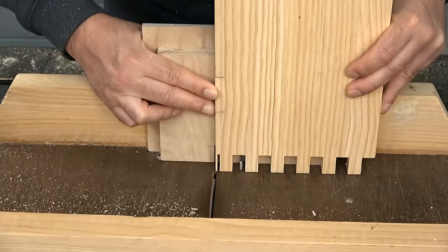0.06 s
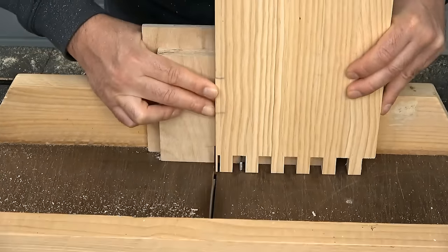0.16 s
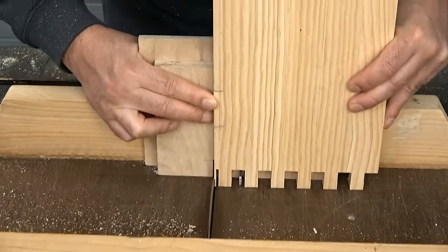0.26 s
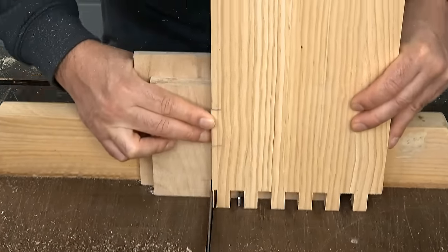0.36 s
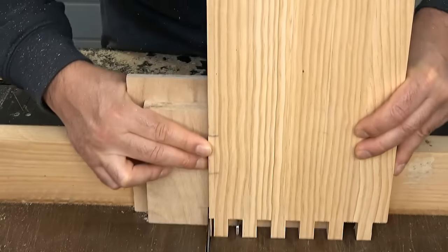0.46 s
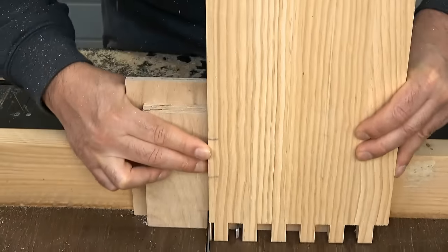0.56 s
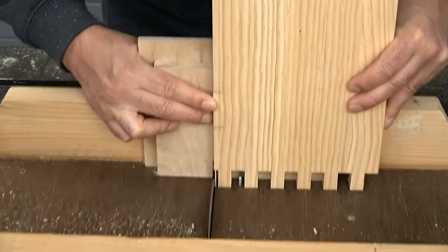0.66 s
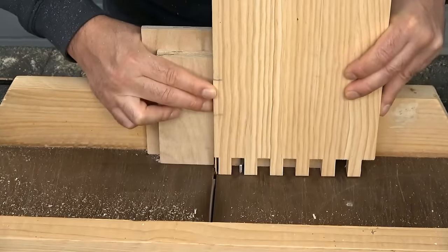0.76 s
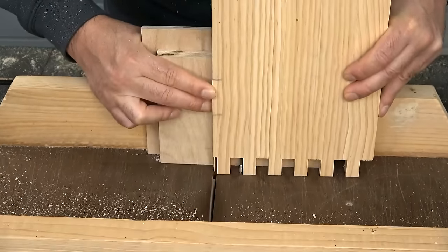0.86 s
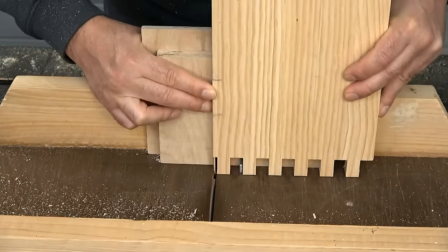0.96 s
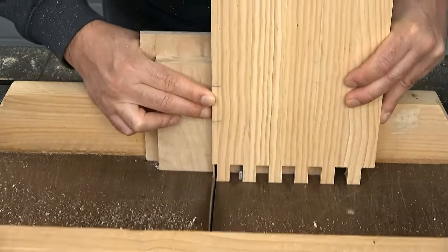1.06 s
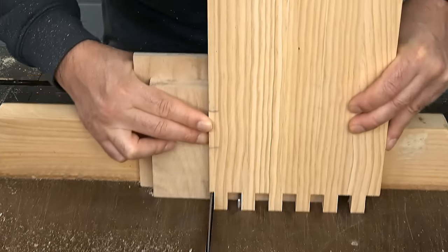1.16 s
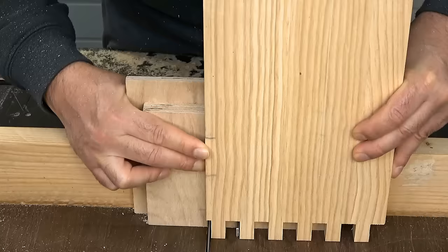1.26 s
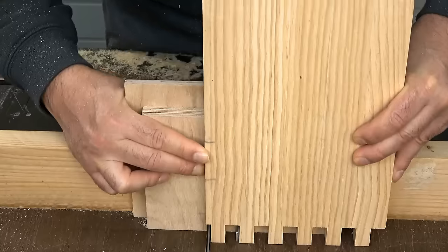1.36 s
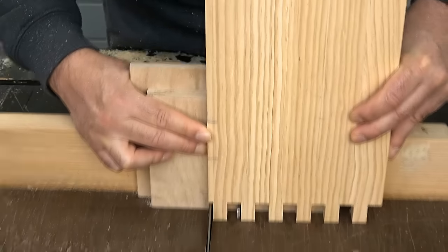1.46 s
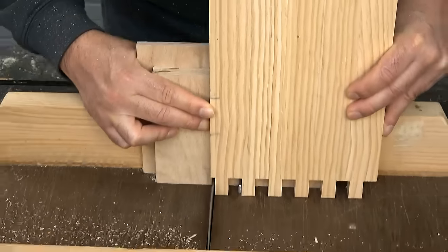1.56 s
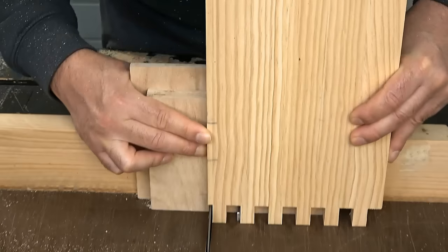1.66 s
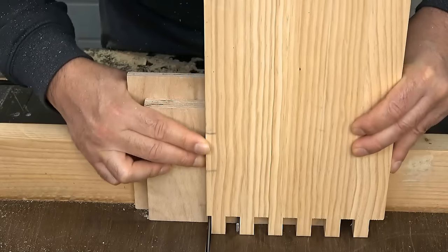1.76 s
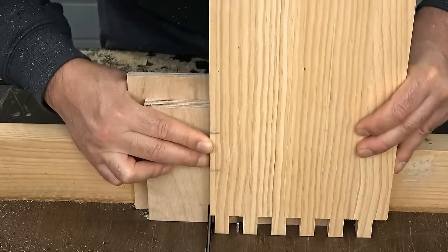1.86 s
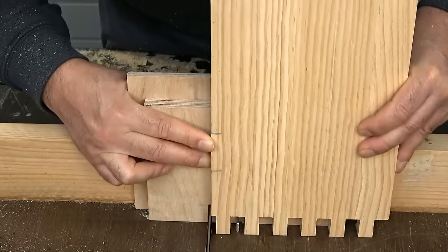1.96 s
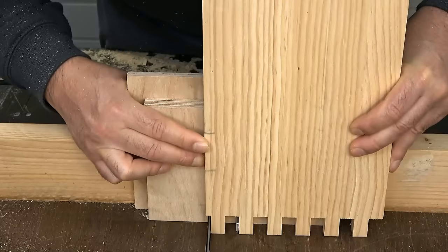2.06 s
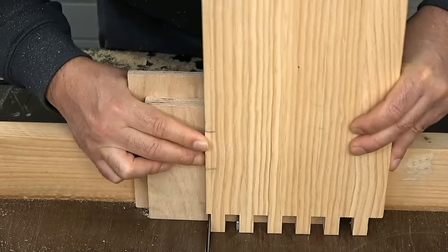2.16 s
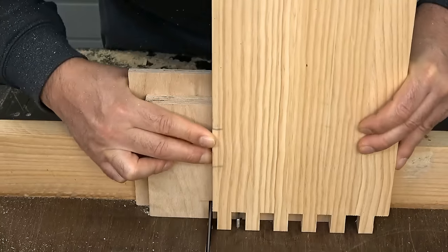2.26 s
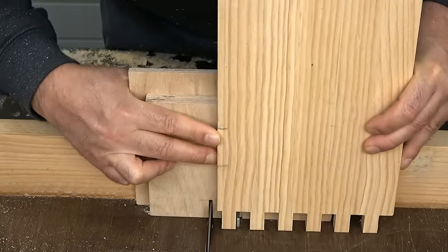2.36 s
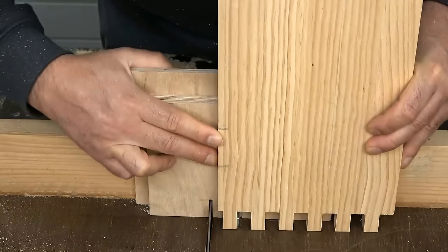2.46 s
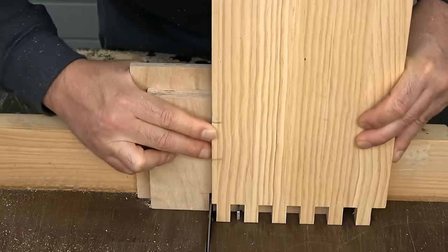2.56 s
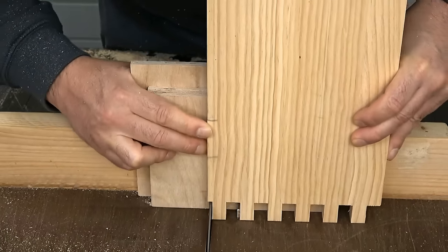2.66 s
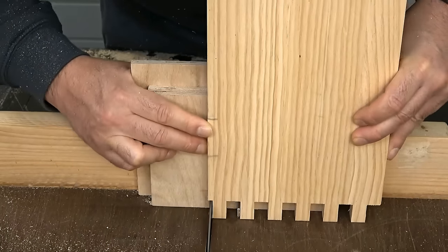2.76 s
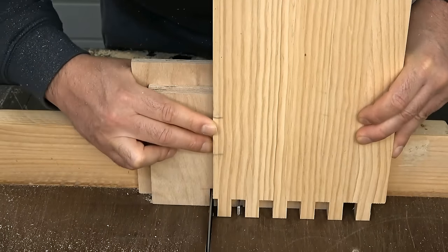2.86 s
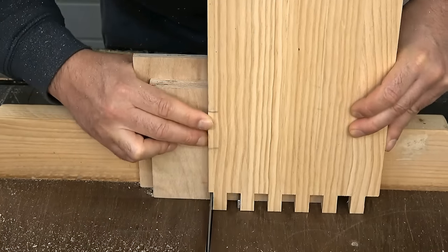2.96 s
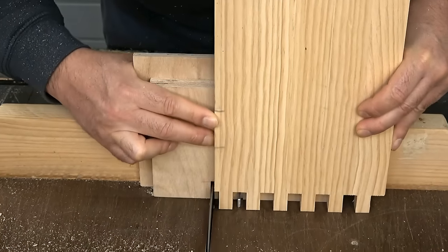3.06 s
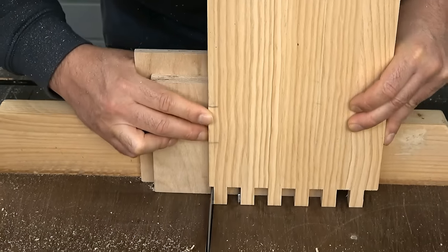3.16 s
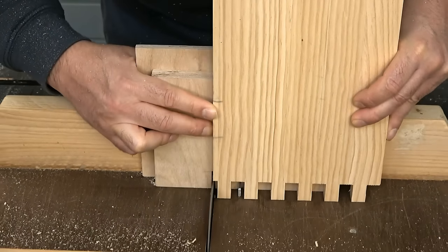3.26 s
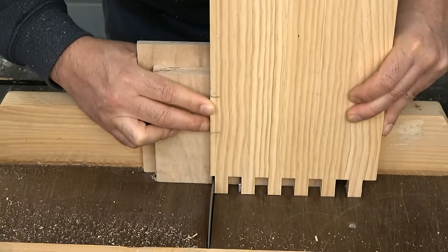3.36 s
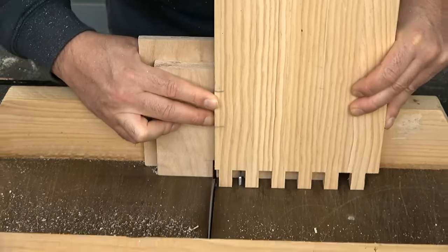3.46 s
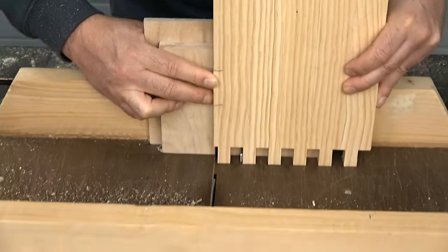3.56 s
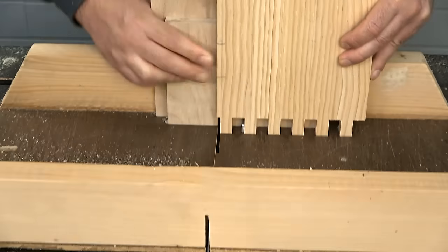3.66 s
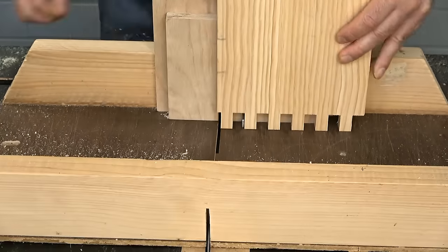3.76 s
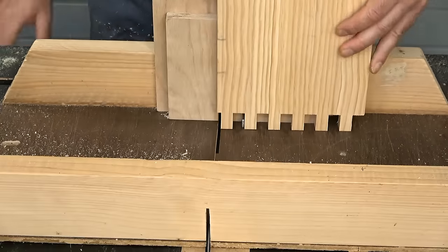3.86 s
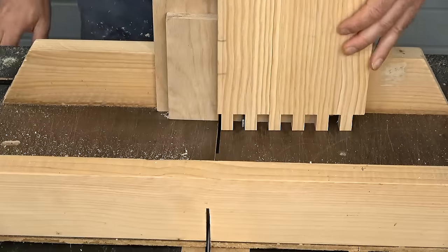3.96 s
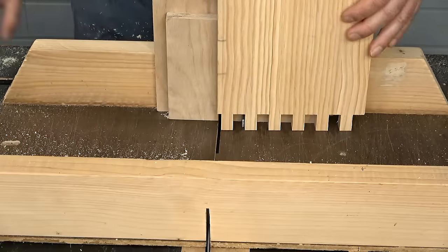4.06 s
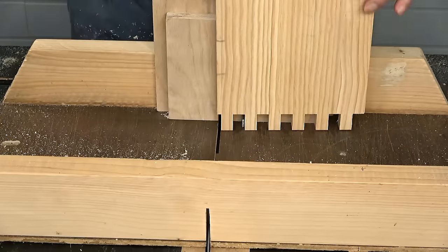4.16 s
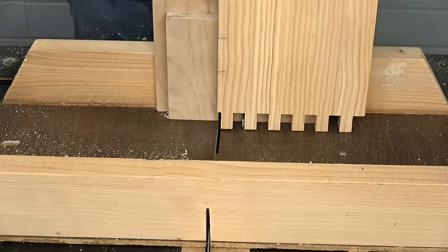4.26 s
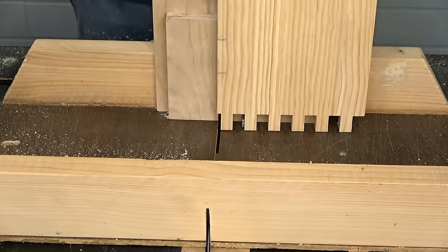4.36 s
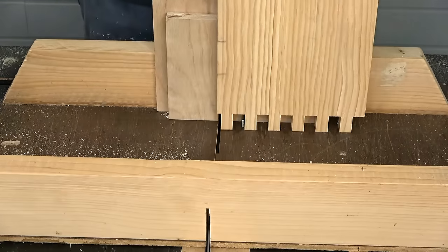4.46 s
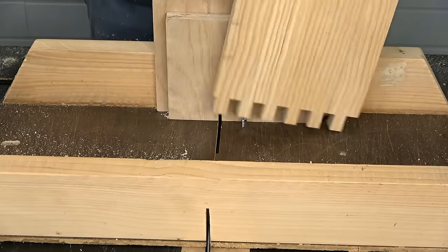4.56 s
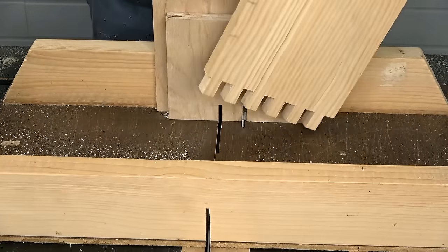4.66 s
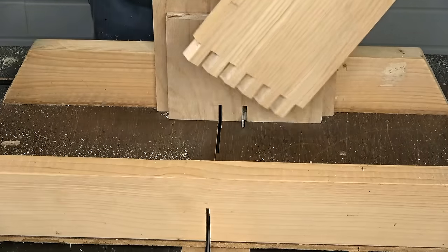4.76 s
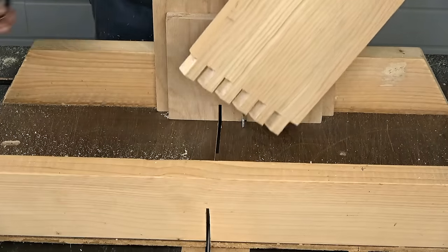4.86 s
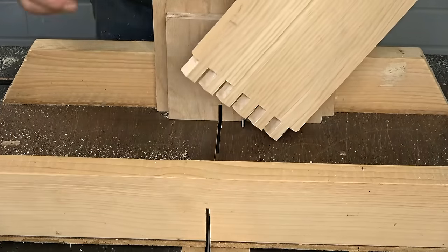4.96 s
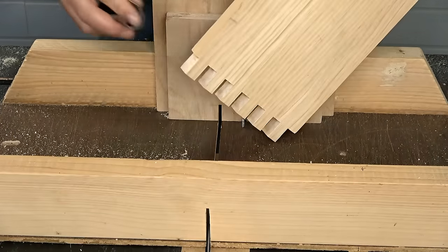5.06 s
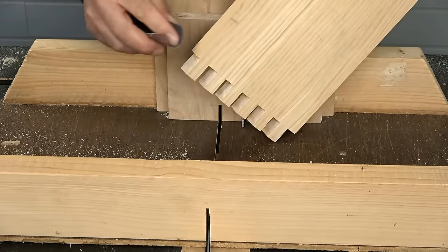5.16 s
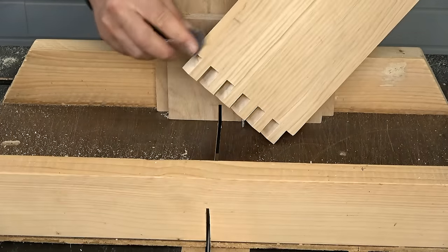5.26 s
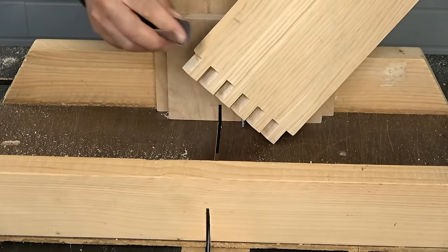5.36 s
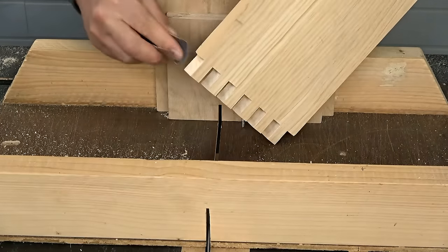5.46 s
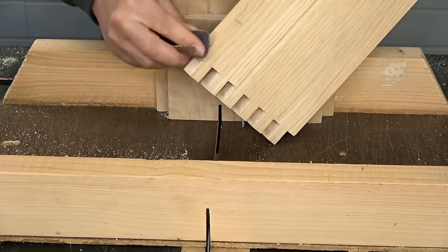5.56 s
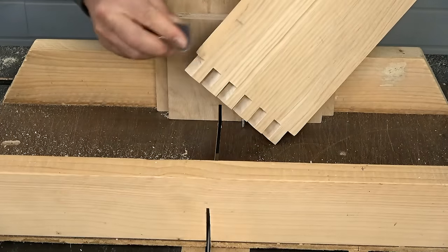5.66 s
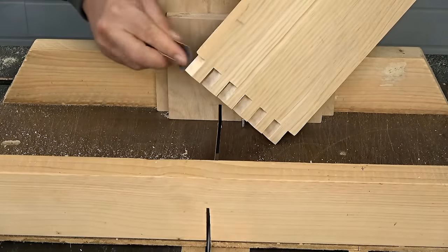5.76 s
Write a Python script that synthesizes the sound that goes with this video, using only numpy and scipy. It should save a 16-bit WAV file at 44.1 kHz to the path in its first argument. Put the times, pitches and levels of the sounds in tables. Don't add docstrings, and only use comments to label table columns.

```python
import sys
import numpy as np
from scipy import signal
from scipy.fft import rfft, irfft, next_fast_len
from scipy.io import wavfile
from scipy.ndimage import uniform_filter1d

SR = 44100
rng = np.random.default_rng(int(sys.argv[2]) if len(sys.argv) > 2 else 0)


def gain_from_decibels(decibels):
    exponent = np.asarray(decibels, float) / 20
    return 10 ** exponent


def waveform_to_disk(signal):
    frames = np.transpose(np.atleast_2d(signal))
    scaled = np.clip(frames, -1, 1) * 32767
    samples = np.round(scaled).astype(np.int16)
    wavfile.write(sys.argv[1], SR, samples)


N = 255766
TIME = np.arange(N) / SR
WHINE_PER_TOOTH, WHINE_PER_TURN, WHINE_PER_GEAR = 6.96, 150, 2.1

# time_s, whine_hz, whine_db, left_lead_rad
RUNNING = [(0, 7032, -33, 0), (.12, 7068, -32, -.9), (.31, 7088, -35.5, -.5), (.41, 6888, -38, .2),
           (.55, 6965, -38.5, .2), (.68, 7018, -32, .3), (.9, 7066, -31.5, -.5), (1.0, 7070, -36.5, -2.2),
           (1.12, 7082, -33, -1.4), (1.2, 7054, -33.5, -.7), (1.48, 7080, -32.5, -1.2),
           (1.62, 7065, -35, -1.3), (2.25, 7034, -32.5, .3), (2.6, 7056, -31.3, -1),
           (3.15, 7056, -33.5, -3), (3.5, 7052, -35, -1.7), (3.75, 7053, -31.3, -1.2),
           (4.06, 7030, -34, .2)]
# centre_s, length_s, level_db
SHADES = [
    (.11, .1, -11),
    (.57, .09, -8),
    (1.07, .44, -10),
    (1.54, .1, -5),
    (1.78, .05, -7),
    (2.15, .17, -12),
    (2.62, .14, -12),
    (3.12, .24, -12),
    (3.4, .3, -3),
]
# start_s, length_s, level_db
OCTAVE = [
    (-.05, .45, -54),
    (.65, .25, -54),
    (1.3, .5, -56),
    (2.2, .25, -57),
    (2.7, .55, -51.5),
    (3.48, .55, -54.5),
]


def brush_whine(whine, on):
    _, right_db, lead = columns(RUNNING)
    shade = sum(db * np.exp(-(2 * (TIME - s) / length) ** 4) for s, length, db in SHADES)
    left_db = right_db - 4.5 + shade + 2.5 * walk(13)
    lag = np.exp(.5j * np.array([[1], [-1]]) * lead)
    wobble = 1 + .1 * np.sin(2 * np.pi * whine / WHINE_PER_TURN)
    level = gain_from_decibels(np.array([left_db, right_db]) + .27) * wobble
    sing = level * (lag * tone(whine, rough=.2, grain_hz=70.27)).real
    octave_level = spells(OCTAVE, -60.5, .08) * gain_from_decibels(1.5 + 1.5 * walk(8))
    octave = octave_level * (np.sqrt(lag) * tone(2 * whine, rough=.25, grain_hz=70)).real
    return (sing + octave) * on


# time_s, gear_hz, gear_db, whine_db
BRAKING = [
    (4.065, 3340, -48, -36),
    (4.14, 2820, -38.5, -40),
    (4.22, 2400, -44, -43),
    (4.31, 2095, -36.5, -42.5),
    (4.42, 1830, -37.5, -44),
    (4.6, 1500, -40.5, -50),
    (4.75, 1235, -45, -51),
    (4.98, 950, -43, -53),
    (5.32, 600, -45, -54),
]
# multiple, level_db
OVERTONES = [(4, -52), (5, -48.5), (6, -47)]
# pitch_hz, width_hz, level_db
RINGS = [(1470, 14, 3), (2030, 25, 5), (3830, 24, 7.5)]


def braking_gears(whine, off):
    gear_hz, gear_db, coast_db = columns(BRAKING)
    turns = whine / WHINE_PER_GEAR
    gear = gain_from_decibels(gear_db + 1.3 * walk(18)) * tone(turns, rough=1.8, grain_hz=290).real
    gear = gear + gain_from_decibels(coast_db + 1.3 * walk(18)) * tone(whine, rough=2.2, grain_hz=520).real
    for k, db in OVERTONES:
        vent = np.exp(-((k * gear_hz - 8420) / 1000) ** 2)
        gear = gear + vent * gain_from_decibels(db + 2 * walk(20)) * tone(k * turns, rough=1., grain_hz=400).real
    gear = gear * off
    gear = gear + sum(gain_from_decibels(db) * resonate(gear, hz, width) for hz, width, db in RINGS)
    gear = gear + shaken_panel(gear_hz) * off
    return place(gear, .15 * np.roll(gear, 300), -1.5) + room(gear)


def shaken_panel(gear_hz):
    peak_hz, reach_hz = 1470, 300
    nearness = 1 / (1 + ((gear_hz - peak_hz) / reach_hz) ** 4)
    panel = tone(1465 * TIME, rough=1.1, grain_hz=120).real
    return gain_from_decibels(-41.5 + 2.4 * walk(15)) * nearness * panel


# start_s, length_s, level_db
WHISTLES = [(-.05, .42, -42), (.37, .1, -46), (.56, .08, -44), (.79, .2, -43.5), (.97, .22, -41.5),
            (1.2, .17, -47), (1.37, .2, -42.5), (1.57, .23, -44.5), (2.26, .3, -38.5), (2.55, .07, -41.5),
            (2.91, .19, -40), (3.12, .2, -51), (3.46, .09, -42), (3.6, .42, -48.5), (4.13, .1, -50)]


def slot_whistle(teeth):
    level = spells(WHISTLES, -60, .07) * gain_from_decibels(.7 * walk(14))
    whistle = level * tone(2 * teeth + .12 * walk(25), rough=.15, grain_hz=45).real
    return place(whistle, 0, -.27)


# start_s, length_s, level_db, brightest_stack (-1 low to 1 high), roughness (0 to 1.5)
BITES = [(.3, .045, -36.5, .45, .45), (.352, .066, -37.5, .15, .45), (.445, .02, -43, -.6, .9),
         (.487, .012, -39, .3, 1.3), (.512, .012, -41, .4, 1.3), (.527, .014, -39, .2, 1.3),
         (.543, .065, -37, -.5, 1.2), (.61, .03, -39, -.8, 1.1), (.725, .025, -42, .1, .6),
         (.74, .035, -39, -.7, .7), (1.123, .03, -40.5, .5, .5), (1.168, .038, -44, .4, .6),
         (2.19, .03, -46, 0, .5)]
# multiple, level_db
TEETH = [
    [(6, -2), (5, -11)],
    [(7, -6), (8, 0), (9, -7)],
    [(3, -3), (4, -8), (5, -8), (10, -1), (11, -13), (12, -10), (13, -13), (14, -13)],
]


def teeth_in_wood(teeth):
    shapes = [gate(s - .002, s + length + .004, edge=.004) for s, length, *_ in BITES]
    stacks = np.arange(-1, 2)[:, None]
    depth, rough = 0, np.zeros(N)
    for (_, _, db, bright, roughness), shape in zip(BITES, shapes):
        depth = depth + gain_from_decibels(db - 9 * (stacks - bright) ** 2) * shape
        rough = np.maximum(rough, np.clip(roughness, 0, 1.5) * (shape > 0))
    cut = 0
    for level, stack in zip(depth, TEETH):
        for k, db in stack:
            blow = tone(k * teeth, rough=rough, grain_hz=330).real
            cut = cut + level * gain_from_decibels(db + 2.5 * walk(25)) * blow
    wide_chips = unit(resonate(rng.standard_normal(N), 7600, 5000))
    narrow_chips = unit(resonate(rng.standard_normal(N), 6200, 450))
    chips = rough * (gain_from_decibels(-7) * depth[1] * wide_chips + gain_from_decibels(-1.5) * depth[0] * narrow_chips)
    cut = gain_from_decibels(-2) * cut + chips
    return place(cut, .35 * np.roll(cut, 40), -.27)


# pitch_hz, level_db (per Hz)
AIR_COLOUR = [(18, -50.5), (30, -31), (160, -10.5), (291, -9.5), (478, -6.5), (1020, -9.5), (1500, -8),
              (2060, -7.5), (2400, -11), (3300, -9.5), (5420, -11), (6850, -9), (8020, -13), (13900, -18.5),
              (15400, -26)]
# pitch_hz, side_minus_mid_db
AIR_SIDE = [(60, -11), (110, -18.5), (200, -21), (380, -18), (700, -17), (1290, -17), (2380, -16),
            (4400, -18), (8120, -5), (15000, -6.5)]
# pitch_hz, left_minus_right_db
AIR_BALANCE = [(60, 1), (110, 1.5), (200, 1), (380, 1.5), (700, -0.5), (1290, -1.5), (2380, -3), (4400, -5),
               (8120, -1.5), (15000, -1)]


def cooling_air(whine):
    speed = np.gradient(whine) * SR / RUNNING[-2][1]
    slowed = 1 - speed
    middle_db = -39.5 + 1.6 * slowed + .15 * walk(4.33)
    bass_db = -7 * slowed + .8 * walk(4)
    treble_db = -8.5 * slowed + .3 * walk(4)
    size = 2 * next_fast_len(N // 2 + 1)
    hz = np.fft.rfftfreq(size, 1 / SR)[1:]
    colour = gain_from_decibels(on_log(hz, AIR_COLOUR))
    spectra = rfft(rng.standard_normal((2, size)))[:, 1:] * colour
    spectra[1] *= gain_from_decibels(on_log(hz, AIR_SIDE))
    norm = np.sqrt(np.sum(colour[(hz > 2300) & (hz < 5500)] ** 2) * 2 / size)
    swell, rasp = walk(3), walk(70)
    rasp = unit(rasp - uniform_filter1d(rasp, size=1600))
    beat = np.sin(2 * np.pi * whine / WHINE_PER_TURN + .82 * walk(5))
    out = 0
    for step in range(19):
        centre = 30 * 2 ** (step / 2)
        share = np.cos(np.pi * np.clip(np.log2(hz / centre), -.5, .5))
        mid, side = irfft(np.pad(spectra * share, ((0, 0), (1, 0))), size)[:, :N] / norm
        above = np.log2(centre / 3500)
        high = np.clip(above, 0, 1)
        low = np.clip(np.log2(1400 / centre) / 2.3, 0, 1.7)
        drift = np.clip(above / 1.4, 0, 1.5) * treble_db + low * bass_db
        flicker = .2 * swell + .7 * walk(14) + (.7 + .5 * high) * (1.2 * rasp + .4 * beat)
        out = out + gain_from_decibels(drift + flicker) * place(mid, side, on_log(centre, AIR_BALANCE))
    return (out + housing(speed)) * gain_from_decibels(middle_db - 3.5)


# pitch_hz, width_hz, level_db
HOUSING = [(78.1, 30, -21), (1357, 28, -14), (1498, 17, -15.5), (1744, 60, -12), (3337, 140, -5.5),
           (3460, 2100, -2.5), (4014, 76, -10.5), (6360, 1500, -5.5), (7280, 530, -4.5), (9430, 150, -26)]


def housing(speed):
    out = 0
    for hz, width, db in HOUSING:
        mid, side = (unit(resonate(rng.standard_normal(N), hz, width)) for _ in range(2))
        side = gain_from_decibels(on_log(hz, AIR_SIDE)) * side
        level = speed ** 1.5 * gain_from_decibels(db + .7 * walk(3.4) + 3.8 * walk(45))
        out = out + level * place(mid, side, on_log(hz, AIR_BALANCE))
    return out


# start_s, length_s, level_db
HUM = [
    [(.35, .35, -58), (1.65, .35, -58), (3.33, .25, -56), (3.65, .22, -53), (3.97, .11, -48.5),
     (4.24, .1, -56)],
    [(.36, .2, -54), (.56, .19, -49.5), (1.27, .22, -52), (1.65, .88, -48), (2.65, .42, -51),
     (3.18, .13, -53), (3.45, .1, -54)],
    [(-.05, .12, -49), (.66, .3, -53), (1.2, .3, -54), (1.8, .75, -49.5), (2.65, .43, -49),
     (3.15, .35, -49.5), (3.7, .2, -53)],
]


def table_top():
    rest_dbs, pitches_hz, grains_hz = (-60, -65, -57), (163, 468, 1206), (60, 45, 55)
    power = np.clip((BRAKING[0][0] - TIME) / .5 + 1, 0, 1) ** 2
    hum = 0
    for rows, rest_db, hz, grain in zip(HUM, rest_dbs, pitches_hz, grains_hz):
        load = np.maximum(spells(rows, -99, .06), gain_from_decibels(rest_db) * power)
        buzz = tone(hz * TIME + .3 * walk(grain / 3), rough=.4, grain_hz=grain).real
        hum = hum + load * gain_from_decibels(.5 + .8 * walk(8)) * buzz
    return place(hum, .1 * np.roll(hum, 500), .3)


def room(x):
    t60_s, level_db = .91, -6.5
    t = TIME[:SR // 2]
    a, b = rng.standard_normal((2, len(t))) * 10 ** (-3 * t / t60_s)
    wash = np.array([a + .25 * b, a - .25 * b])
    wash = wash / np.sqrt(np.sum(wash[0] ** 2))
    return gain_from_decibels(level_db) * signal.fftconvolve(x[None], wash, axes=1)[:, :N]


def columns(table):
    s, *rest = np.transpose(table)
    return [np.interp(TIME, s, c) for c in rest]


def gate(start, end, edge=.006):
    return np.clip(np.minimum(TIME - start, end - TIME) / edge, 0, 1)


def spells(rows, rest_db, edge):
    gains = [gain_from_decibels(db) * gate(s - edge / 2, s + length + edge / 2, edge) for s, length, db in rows]
    return np.max(gains + [np.full(N, gain_from_decibels(rest_db))], axis=0)


def unit(x):
    return x / np.sqrt(np.mean(x ** 2))


def walk(rate):
    levels = rng.standard_normal(int(N / SR * rate) + 2)
    joined = np.interp(TIME * rate, np.arange(len(levels)), levels)
    return unit(uniform_filter1d(joined, int(SR / rate / 2)))


def tone(cycles, rough=0., grain_hz=60.):
    shiver = 1 + rough * (walk(grain_hz) + 1j * walk(grain_hz))
    return np.sqrt(2 / (1 + 2 * rough ** 2)) * shiver * np.exp(2j * np.pi * cycles)


def resonate(x, hz, width):
    return signal.lfilter(*signal.iirpeak(hz, hz / width, fs=SR), x)


def on_log(hz, table):
    f, v = np.transpose(table)
    return np.interp(np.log(hz), np.log(f), v)


def place(mid, side, pan_db):
    return gain_from_decibels(np.array([[.5], [-.5]]) * pan_db) * np.array([mid + side, mid - side])


def scene():
    switch_s = BRAKING[0][0]
    running_hz = columns(RUNNING)[0] + 4 * walk(14)
    times, periods = np.transpose([(s, 1 / f) for s, f, *_ in BRAKING])
    braking_hz = WHINE_PER_GEAR / np.interp(TIME, times, periods)
    hz = np.where(TIME < switch_s, running_hz, braking_hz)
    whine = np.cumsum(uniform_filter1d(hz, size=400)) / SR
    teeth = whine / WHINE_PER_TOOTH
    off = np.clip((TIME - switch_s) / .02 + .5, 0, 1)
    motor = brush_whine(whine, 1 - off) + braking_gears(whine, off)
    blade = slot_whistle(teeth) + teeth_in_wood(teeth)
    return motor + blade + cooling_air(whine) + table_top()


def roll_off(x):
    return signal.sosfilt(signal.butter(12, 15790, fs=SR, output="sos"), x)


def record(dry):
    dip_s, rise_s, end_s = 4.2443, .0165, 5.336
    since = TIME - dip_s
    dip = np.where(since < 0, 1, np.clip(.08 + since / rise_s * .55, 0, 1))
    dip = np.where(since > rise_s - .001, 1, dip)
    dry = signal.sosfilt(signal.ellip(10, .3, 70, 15750, fs=SR, output="sos"), dry)
    fade = np.clip((end_s - TIME) / .82, 0, 1)
    last_fall = np.clip((end_s - .008 - TIME) / .04, 0, 1)
    return roll_off(dry * dip * fade * last_fall)


dry = scene()
out = record(dry)
waveform_to_disk(out)
```